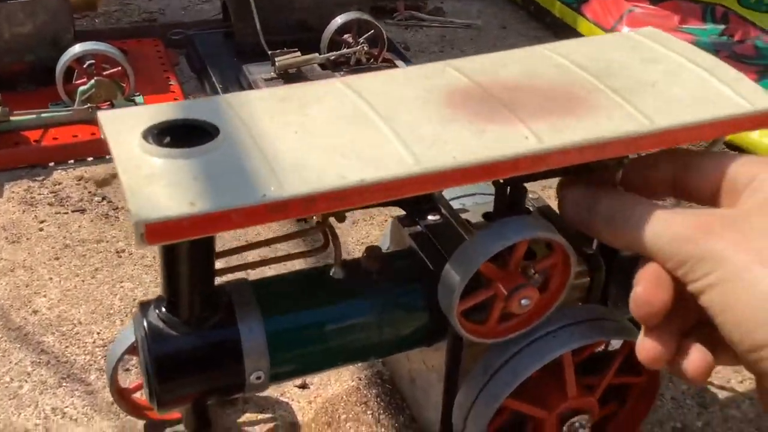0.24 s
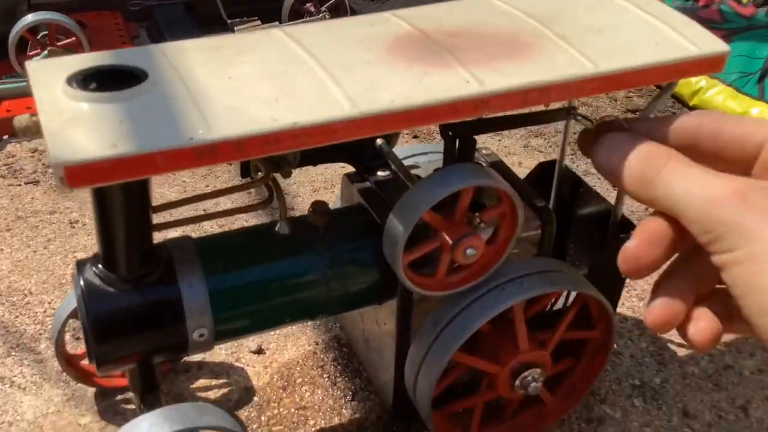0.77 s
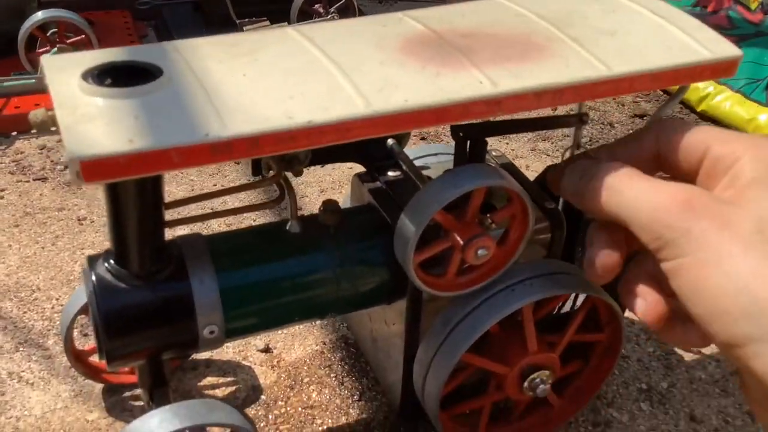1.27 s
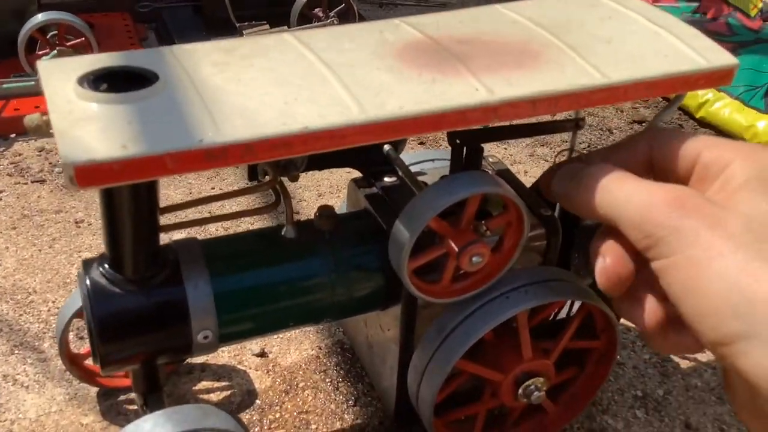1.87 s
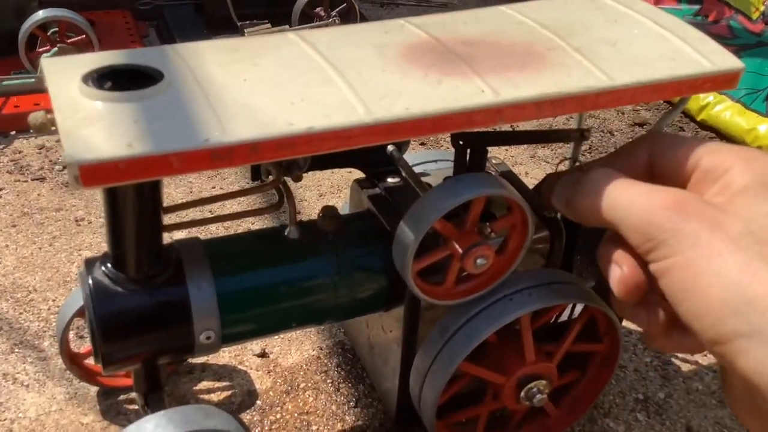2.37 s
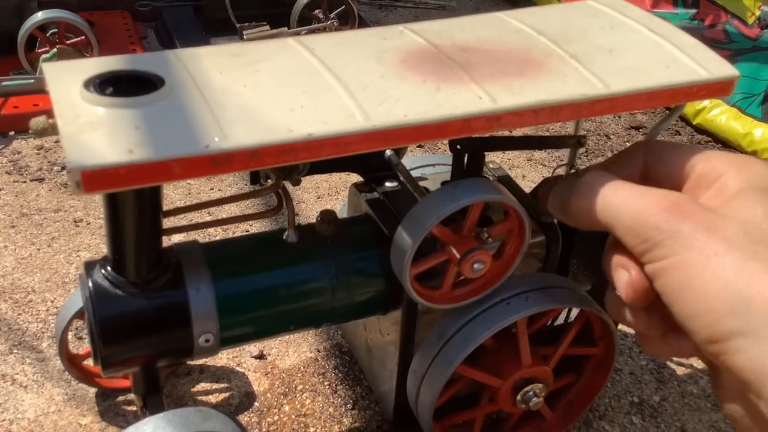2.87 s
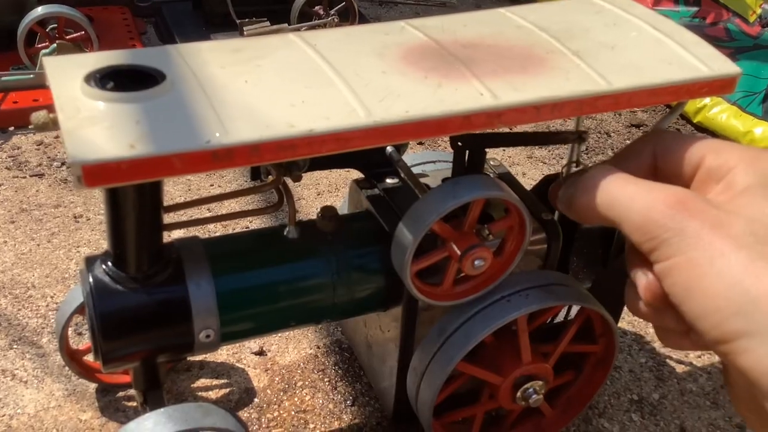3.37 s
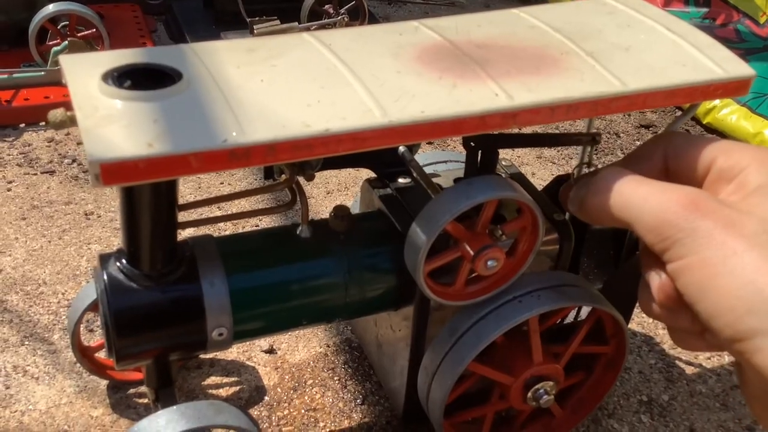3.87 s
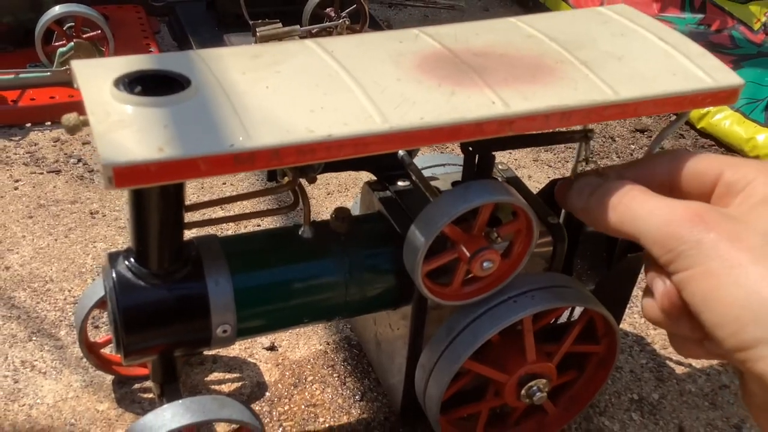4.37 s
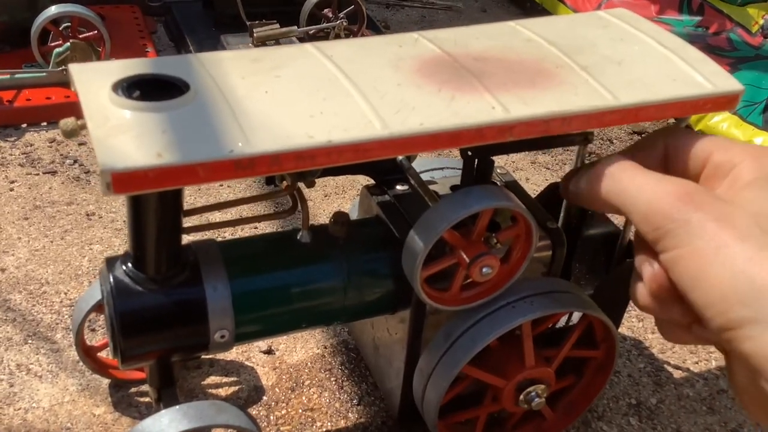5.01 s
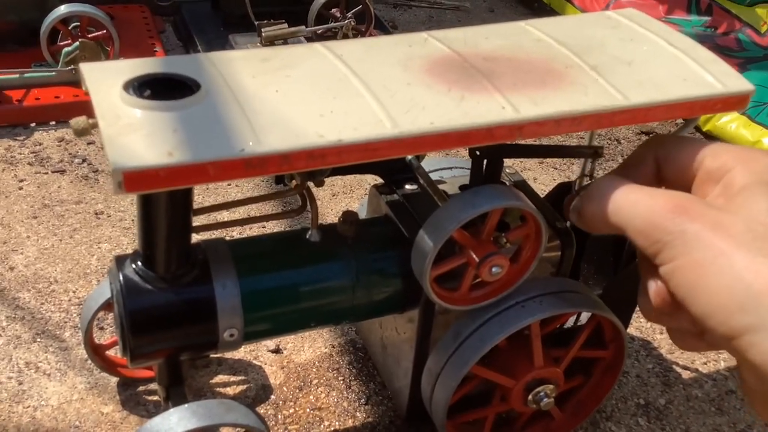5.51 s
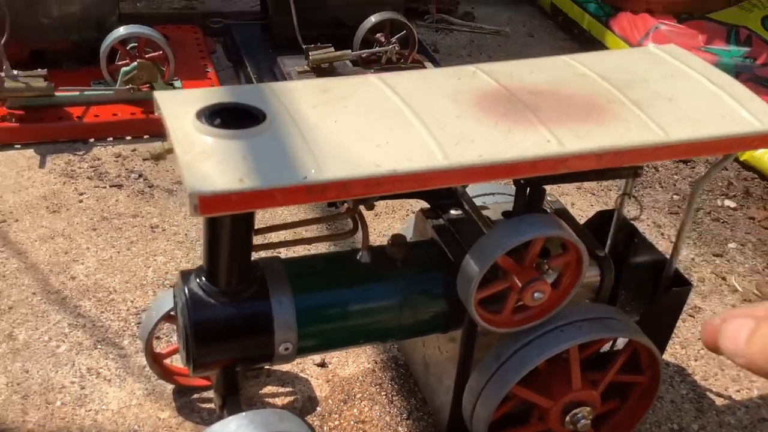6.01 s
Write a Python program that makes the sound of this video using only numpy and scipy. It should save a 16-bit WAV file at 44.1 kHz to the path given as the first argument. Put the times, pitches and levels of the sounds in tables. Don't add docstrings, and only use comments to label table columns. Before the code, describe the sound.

Outdoors and close to the microphone, a miniature steam engine ticks over rapidly, puffing and rattling its tin roof, with wind thumps and small rod clinks in the first second. A short steam leak leads into a very loud, piercing whistle blast. Five more toots follow, short and long, each gliding up quickly, wrapped in hiss and dropping off sharply. The pitch slowly sags and the last toot is thin and breathy. The background stays much quieter after the first blast.

```python
import sys
import numpy as np
from scipy import signal
from scipy.fft import rfft, irfft, next_fast_len
from scipy.io import wavfile
from scipy.ndimage import uniform_filter1d, map_coordinates

SR = 44100
rng = np.random.default_rng(int(sys.argv[2]) if len(sys.argv) > 2 else 0)


def wrap_up_sound(samples):
    columns = np.atleast_2d(samples).T
    tamed = np.clip(columns, -1, 1)
    steps = np.round(tamed * 32767).astype(np.int16)
    wavfile.write(sys.argv[1], SR, steps)


def nominal_scale(level):
    x = np.asarray(level, float) / 20
    return 10 ** x


N = 275625

# opening in seconds, rise in seconds, shut in seconds,
# fall in seconds, hiss in dB over the surroundings.
TOOTS = [
    (1.228, 0.018, 1.658, .022, 9),
    (1.893, .03, 2.562, .02, 11.5),
    (2.79, 0.015, 3.1, 0.015, 13),
    (3.257, 0.022, 4.254, 0.025, 14.5),
    (4.723, 0.034, 4.968, 0.034, 15.5),
    (5.158, 0.013, 5.803, .022, 14.5),
]


def unit(x):
    return x / np.sqrt(np.mean(x ** 2) + 1e-20)


def curves(rows):
    s, *cols = np.transpose(rows)
    return [np.interp(np.arange(N) / SR, s, c) for c in cols]


def gate(start_s, end_s, edge_s):
    t = np.arange(N) / SR
    return np.clip(np.minimum(t - start_s, end_s - t) / edge_s, 0, 1)


def wobble(rate_hz):
    knots = rng.standard_normal(int(N * rate_hz / SR) + 4)
    return map_coordinates(knots, [np.arange(N) * rate_hz / SR])


def filtered(x, response):
    m = next_fast_len(N + SR // 2)
    return irfft(rfft(x, m) * response(np.fft.rfftfreq(m, 1 / SR)), m)[:N]


def slope(points):
    f, db = np.transpose(points)
    return lambda hz: nominal_scale(np.interp(np.log(hz + 1), np.log(f), db))


def resonances(modes):
    def response(f):
        total = 0
        for k, (c, w, db) in enumerate(modes):
            total = total + (-1) ** k * nominal_scale(db) * 1j * f * w / (c * c - f * f + 1j * f * w)
        return total
    return response


def noise(response):
    return unit(filtered(rng.standard_normal(N), response))


def surroundings(level_db):
    # Hz, dB per Hz.
    air_spectrum = [(18, -45.5), (30, -2.5), (113, 0.5), (511, -7.5), (794, -9.5), (1410, -9),
                    (1600, -11.5), (1870, -11), (4540, -14.5), (6040, -20), (6530, -17), (11300, -24),
                    (15000, -41)]
    # time in seconds, pitch in Hz, level in dB.
    hum_course = [(0, 126.2, -80), (1, 126, -73), (1.2, 126, -47.5), (1.3, 126, -71.5), (1.7, 126, -80.5),
                  (1.87, 126, -58.5), (2.1, 125.8, -80), (2.7, 125.5, -71.5), (4.3, 123.2, -68.5),
                  (6.25, 120.5, -65.5)]
    # Hz, width in Hz, level in dB.
    overtones = [(436.7, 44, 0.5), (614, 30, -2.5), (920, 35, -3)]
    hz, hum_db = curves(hum_course)
    air = nominal_scale(level_db + 0.72 * wobble(11)) * noise(slope(air_spectrum))
    phase = 2 * np.pi * np.cumsum(hz + 1.4 * wobble(23)) / SR
    hum = nominal_scale(hum_db + 2 + 1.5 * wobble(2.6)) * np.sin(phase)
    return air + hum + nominal_scale(hum_db - 12.0) * noise(resonances(overtones))


def wind():
    # start in seconds, peak in dB, settled pitch in Hz.
    thumps = [(0.009, -32.5, 144), (0.177, -35.5, 138), (0.297, -35.5, 75), (0.344, -29.5, 153),
              (0.393, -30.5, 117), (0.46, -40, 95.5), (0.642, -36, 115), (0.779, -34.5, 104),
              (0.878, -37.5, 80.7), (0.979, -42, 94.2), (1.743, -42.5, 621), (1.957, -42, 105),
              (2.118, -44, 418), (5.724, -52.5, 220)]
    x, t = np.zeros(N + SR), np.arange(SR // 10) / SR
    puff = noise(slope([(60, -4), (200, 2), (650, -4), (1100, -33)]))
    for s, db, hz in thumps:
        i = round(s * SR)
        cycles = hz * (t + 0.0058 * (1 - np.exp(-t / 0.001997)))
        shape = nominal_scale(db - 1 - 60 * t / 0.081) * (1 - np.exp(-t / 0.0052))
        x[i:][:len(t)] += shape * (np.sin(2 * np.pi * cycles) + 0.58 * puff[i:][:len(t)])
    return x[:N]


def squeak(level_db):
    t = np.arange(N) / SR
    beat = np.clip(np.sin(2 * np.pi * (12.66 * t - .535)), 0, 1)
    return nominal_scale(level_db - 13 - 2.5 * t) * beat * noise(resonances([(11640, 324, 0)]))


def rod():
    # start in seconds, peak in dB, upper mode in dB, crack in dB.
    clinks = [(0.5894, -28.5, -14, -15.5), (0.6445, -26, 4.5, -8.5), (0.7035, -28.5, -4, -10.5),
              (0.762, -32, 3, -11), (0.82, -32.5, 9.5, -12.5), (0.88, -38, 15, -14),
              (0.9378, -41.5, -3, -12), (0.9995, -37, 6, -9.5), (1.054, -26, 8, -23),
              (1.1106, -25, 2.5, -9.5), (1.1697, -40.5, -2.5, -8), (1.5165, -46, 11, -17),
              (1.8652, -41, 0, -9.5), (1.9021, -40, -5, -14), (1.9757, -38, 8, -10), (2.0343, -48, 4, -17),
              (4.2785, -62, -6, -12.5), (4.335, -59, -2.5, -15), (6.114, -58, -1, -4)]
    mode_hz = (2314, 4600)
    x, t = np.zeros(N + SR), np.arange(SR // 20) / SR
    fade = nominal_scale(-60 * t / .028)
    for s, db, upper_db, crack_db in clinks:
        detune = 1 + 0.016 * rng.standard_normal()
        lower = np.sin(2 * np.pi * mode_hz[0] * t)
        upper = nominal_scale(upper_db) * fade * np.sin(2 * np.pi * mode_hz[1] * detune * t)
        ring = fade * (lower + upper) * (1 - np.exp(-t / 0.0013))
        crack = nominal_scale(crack_db + 6.5 - 60 * t / 0.00703) * np.diff(rng.standard_normal(len(t) + 1))
        x[round(s * SR):][:len(t)] += nominal_scale(db) * (ring + crack)
    return filtered(x[:N], slope([(9000, 1.5), (14000, -23.5)]))


def engine(level_db):
    # time in seconds, turns so far.
    shaft = [(.029, 0), (1.029, 17), (1.836, 31), (2.757, 47), (3.215, 55), (4.308, 74), (5.057, 87),
             (5.86, 101), (6.2025, 107)]
    # Hz, dB per Hz.
    exhaust_spectrum = [(290, -27), (500, -6.5), (792, -12.5), (886, -5.5), (1220, 0.5), (1420, -23),
                        (1590, -2.5), (1850, -7), (4530, 0.5), (6060, -9.5), (6590, -1.5), (11200, -13.5),
                        (14000, -44.5)]
    # Hz, width in Hz, level in dB.
    frame_modes = [(799, 32, -2.5), (1614, 36, -2.5)]
    crank_modes = [(4220, 210, -2.5), (4850, 210, -1), (2360, 67, -0.5)]
    roof_modes = [(2995, 110, -4), (3290, 110, -4), (3593, 70, -1), (5030, 84.7, -11.5), (1611, 17, -12.5),
                  (11200, 160, -9.5)]
    # time in seconds, crank in dB, roof in dB.
    view = [(0, -7.5, -19), (1, -2.5, -8.5), (2.7, -9, -7.5), (4.3, -16, 1), (6.25, -17.5, -1.5)]

    s, turns = np.transpose(shaft)
    crank_db, roof_db = curves(view)
    chance = rng.standard_normal((108, 4))
    when_s = np.interp(np.arange(108), turns, s) + .001 * chance[:, 0]
    back_s = when_s + .031 + .005 * chance[:, 2]
    forward, back = np.zeros(N), np.zeros(N)
    forward[(when_s * SR).astype(int)] = nominal_scale(1.4 * chance[:, 1])
    back[(back_s * SR).astype(int)[:-1]] = nominal_scale(3 * chance[:-1, 3])

    t = np.arange(SR // 20) / SR
    puff_shape = (1 - np.exp(-t / .003)) * np.exp(-t / .0068)
    shake_shape = t / .005 * np.exp(-t / 0.0054)
    puff = signal.fftconvolve(forward + nominal_scale(-11) * back, puff_shape)[:N]
    shake = signal.fftconvolve(forward + nominal_scale(-8.5) * back, shake_shape)[:N]
    rough_puff = puff * nominal_scale(2 * wobble(700)) * rng.standard_normal(N)
    exhaust = unit(filtered(rough_puff, slope(exhaust_spectrum)))

    def shaken(modes):
        return unit(filtered(shake * rng.standard_normal(N), resonances(modes)))

    metal = nominal_scale(-7.5) * shaken(frame_modes) + nominal_scale(crank_db) * shaken(crank_modes)
    metal = metal + nominal_scale(roof_db) * shaken(roof_modes)
    return nominal_scale(level_db - 9.5) * (exhaust + metal)


def steam(level_db):
    # Hz, dB per Hz.
    hiss_spectrum = [(900, -17), (2000, -28.5), (2700, -10.5), (3300, -5.5), (3800, -13), (4100, -18.5),
                     (4500, -6.5), (5200, 0.5), (6000, -2), (7600, 1.5), (9000, -1), (11000, -5),
                     (12500, -13.5), (15600, -14.5)]
    rumble_spectrum = [(18, -47.5), (30, -12), (119, -0.5), (333, -8.5), (535, -6.5), (1030, -19),
                       (1500, -28.5), (1950, -53), (3300, -120)]
    # Hz, width in Hz, level in dB.
    slot_full = [(8280, 300, 0), (7700, 250, -8), (9500, 500, -9)]
    slot_spent = [(7735, 420, 0)]
    # time in seconds, share from 0 to 1.
    sag_course = [(2.0, 0.09), (2.4, 1)]
    # start in seconds, shut in seconds, hiss in dB over the surroundings,
    # slot rush in dB over the hiss, rumble in dB over the surroundings.
    leak = (1.05, 1.235, 3, 14.5, -10)
    lead_s, lag_s = .014, 0.02
    spurt_extra_db, spurt_s = 2, .05
    slot_over_hiss_db, rumble_over_air_db = 8.5, 2.5

    sag = np.clip(curves(sag_course)[0], 0, 1)
    rush = (1 - sag) * noise(resonances(slot_full)) + sag * noise(resonances(slot_spent))
    hiss, rumble = noise(slope(hiss_spectrum)), noise(slope(rumble_spectrum))
    spit = nominal_scale(1.3 * wobble(60))
    jet, t = np.zeros(N), np.arange(N) / SR
    flows = [leak]
    for start, _, end, _, db in TOOTS:
        flows.append((start - lead_s, end + lag_s, db, slot_over_hiss_db, rumble_over_air_db))
    for start, end, hiss_db, slot_db, rumble_db in flows:
        spurt_db = spurt_extra_db * np.exp(-np.abs(t - start) / spurt_s)
        spray = spit * nominal_scale(hiss_db + spurt_db) * (nominal_scale(8.0) * hiss + nominal_scale(slot_db) * rush)
        jet += gate(start, end, .02) ** 2 * (spray + nominal_scale(rumble_db) * rumble)
    return nominal_scale(level_db) * jet


def whistle():
    # time in seconds, pitch in Hz, tone in dB.
    holds = [
        [(1.245, 6794, -3.5), (1.254, 6830, -8.5), (1.3, 6907, -14), (1.6, 6870, -14), (1.634, 6830, -15)],
        [(1.922, 5930, -29.5), (1.948, 6580, -23.5), (1.956, 6740, -12.5), (1.985, 6850, -10.5),
         (2.034, 6950, -15.5), (2.166, 6954, -13.5), (2.466, 6940, -14), (2.512, 6870, -12.5),
         (2.55, 6885, -16)],
        [(2.805, 6740, -14.5), (2.825, 6810, -16), (2.97, 6900, -18), (3.014, 6750, -14.5), (3.086, 6678, -16)],
        [(3.283, 6740, -17), (3.4, 6844, -19), (3.46, 6736, -16.5), (3.72, 6738, -16.5), (3.83, 6656, -19.5),
         (3.89, 6733, -18), (3.985, 6606, -22), (4.1, 6708, -18), (4.23, 6610, -27)],
        [(4.76, 6600, -19), (4.782, 6694, -15), (4.9, 6640, -18), (4.935, 6580, -25.5)],
        [(5.176, 6654, -17.5), (5.34, 6660, -18.5), (5.38, 6540, -28), (5.43, 6630, -20.5), (5.465, 6450, -32),
         (5.5, 6590, -27.5), (5.58, 6540, -29), (5.775, 6443, -27.5)],
    ]
    # start in seconds, end in seconds, rate in Hz, pitch swing in Hz, level swing in dB.
    tremor_settings = (3.5, 4, 8.5, 44.5, -0.7)
    crack_hz, crack_db = 4860, -58.5
    seat_hz, seat_db = 5460, -46.5
    ease, glide_bend = 1.3, 2.2
    clear_breath, clear_db, breath_per_db, breath_max = .06, -17, .036, .6

    tone, t = np.zeros(N), np.arange(N) / SR
    turbulence = wobble(260) + 1j * wobble(260) + 0.2017 * (wobble(1300) + 1j * wobble(1900))
    skirt = 0.02 * (wobble(2200) + 1j * wobble(2200))
    flutter = wobble(45)
    first_s, last_s, rate_hz, swing_hz, swing_db = tremor_settings
    turn = 2 * np.pi * rate_hz * (t - first_s)
    tremor = gate(first_s, last_s, .05) * (np.sin(turn) - .35 * np.sin(2 * turn))
    for (start, rise, end, fall, _), hold in zip(TOOTS, holds):
        hz, db = curves(hold)
        opening = np.clip(1 - (t - start) / rise, 0, 1) ** ease
        closing = np.clip(1 - (end - t) / fall, 0, 1) ** ease
        hz, db = hz + swing_hz * tremor, db + swing_db * tremor
        hz = hz + (crack_hz - hz) * opening ** glide_bend + (seat_hz - hz) * closing ** glide_bend
        db = db + (crack_db - db) * opening + (seat_db - db) * closing
        breath = clear_breath + breath_per_db * np.clip(clear_db - db, 0, None)
        breath = np.clip(breath, 0, breath_max)
        shaken_hz = hz * (1 + (0.0015 + .008 * breath) * flutter)
        cycle = np.exp(2j * np.pi * np.cumsum(shaken_hz) / SR)
        swing = cycle * (1 + breath * turbulence + skirt)
        fundamental = nominal_scale(db + 2.5 + .5 * flutter) * swing
        octave = nominal_scale(1.39 * db - 27.5) * swing * cycle
        tone += gate(start, end, 0.001) * (fundamental + octave).real
    return tone


def yard(x):
    t = np.arange(SR // 6) / SR
    fade = nominal_scale(-60 * t / .35) * np.cos(np.pi * 3 * t) * (t > .01)
    scatter = fade * rng.standard_normal(len(t))
    return x + signal.fftconvolve(x, nominal_scale(-28.0) * unit(scatter) / np.sqrt(len(t)))[:N]


def scene():
    # time in seconds, level in dB.
    gain = [(0, -49.5), (1, -48.5), (1.243, -49), (1.265, -60), (1.7, -62.5), (1.87, -59), (2.1, -64),
            (2.7, -66.5), (3.2, -70.5), (4.3, -73), (5.1, -71.5), (6.25, -70)]
    (air_db,) = curves(gain)
    echoing = yard(whistle() + steam(air_db) + engine(air_db + 11.5) + rod())
    mono = echoing + squeak(air_db) + wind() + surroundings(air_db)
    return np.array([mono, mono])


def hollowed(x):
    # time in seconds, margin under the tone in dB.
    margin = [(1.2, 60), (1.34, 57), (1.39, 45.5), (1.41, 32.5), (1.53, 33), (1.56, 68), (2.1, 50),
              (2.25, 46.5), (4.2, 47.5), (4.85, 50), (5.36, 49)]
    # Hz, dB.
    spread = [(4900, -60), (5300, -12), (6400, -11), (7200, 6), (8200, 0), (10000, -3), (10500, -16),
              (13000, -24), (15500, -27)]
    hz, t, z = signal.stft(x, SR, nperseg=2048)
    power = np.abs(z[:-1]) ** 2
    bands = power.reshape(64, 16, -1).mean(axis=1)
    margin_db = np.interp(t, *np.transpose(margin))
    mask = power.max(axis=0) * nominal_scale(-2 * margin_db) * slope(spread)(hz[8:-1:16])[:, None] ** 2
    waver = unit(uniform_filter1d(rng.standard_normal(mask.shape), 7))
    mask = mask * nominal_scale(4 * waver)
    z[:-1] *= np.repeat(bands > mask, 16, axis=0)
    return signal.istft(z, SR, nperseg=2048)[1][:N]


def roll_off(x):
    return signal.sosfilt(signal.butter(12, 15830, fs=SR, output="sos"), x)


def record(dry):
    envelope = np.abs(signal.hilbert(dry[0]))
    held = dry[0] / (1 + (envelope / .9) ** 8) ** (1 / 8)
    mono = hollowed(filtered(held, slope([(20, -60), (58, 0.5)])))
    return roll_off(np.array([mono, mono]))


dry = scene()
out = record(dry)
wrap_up_sound(out)
```